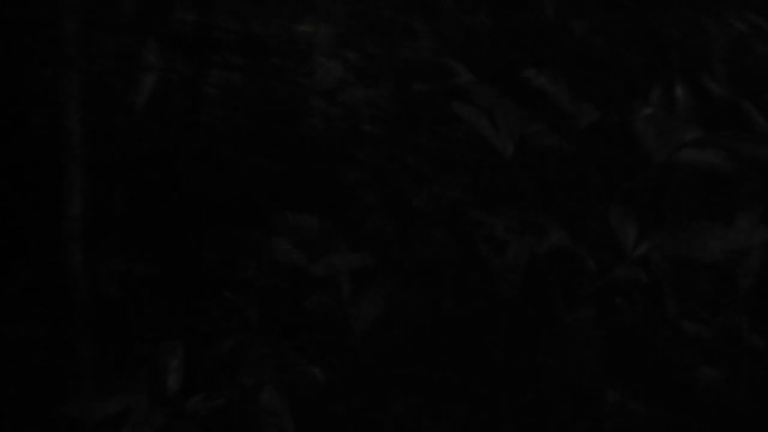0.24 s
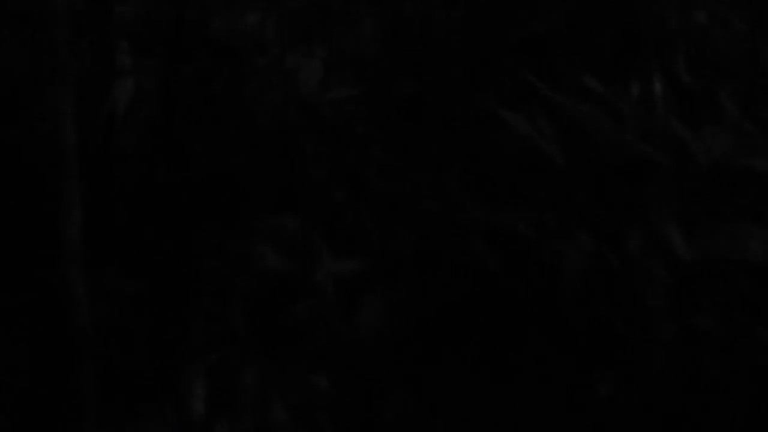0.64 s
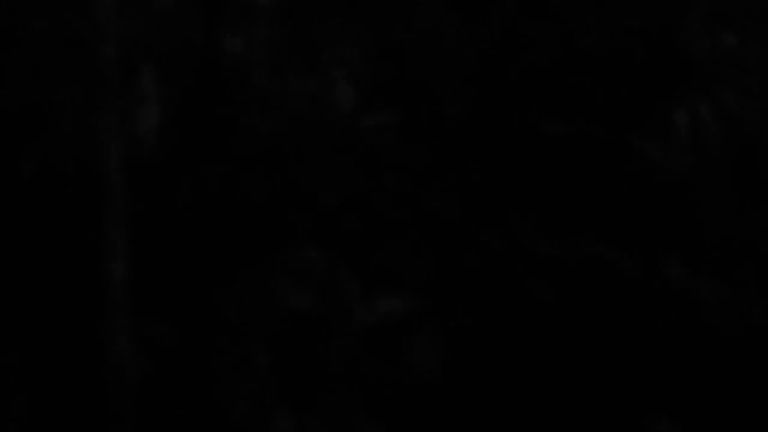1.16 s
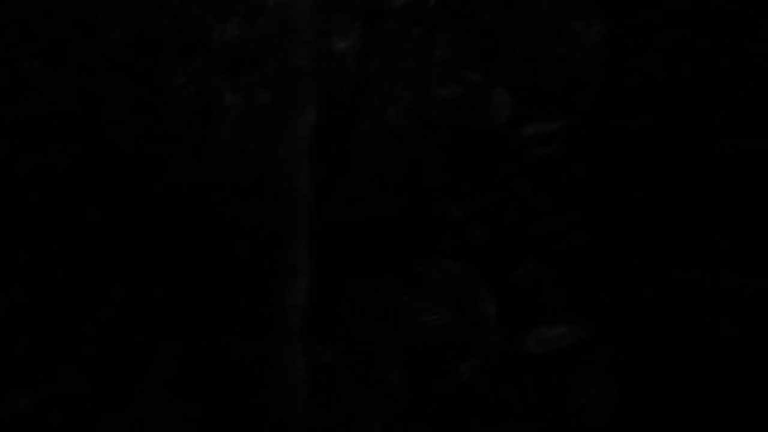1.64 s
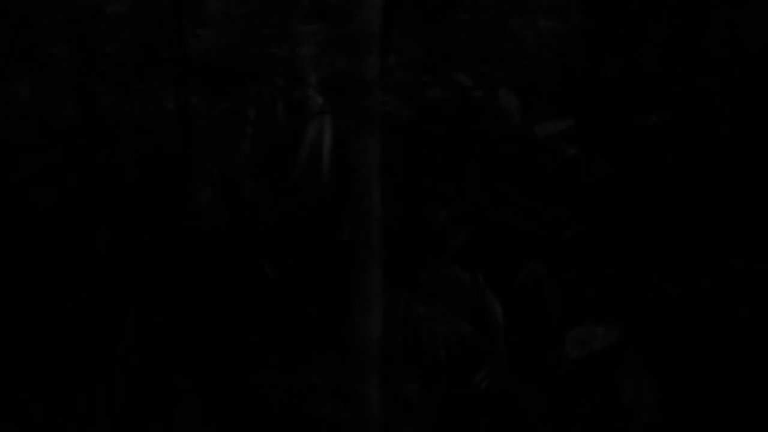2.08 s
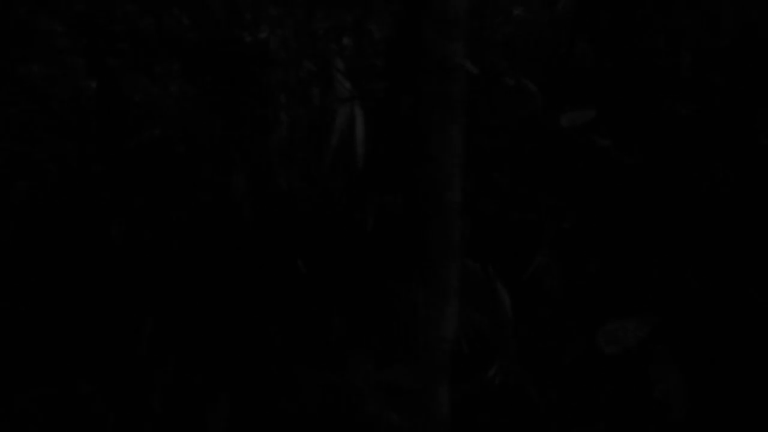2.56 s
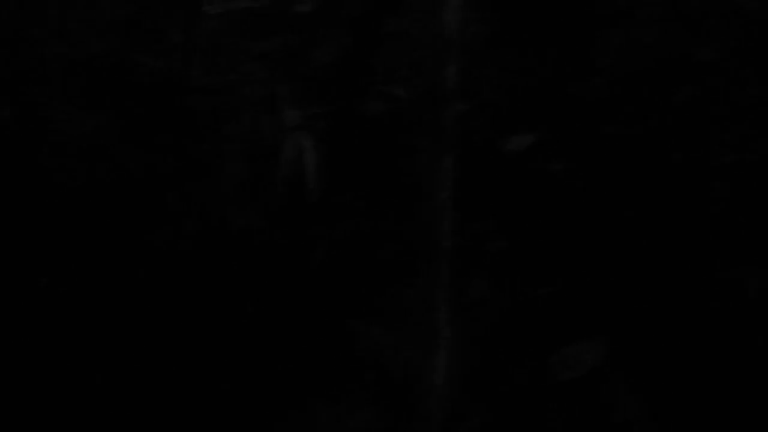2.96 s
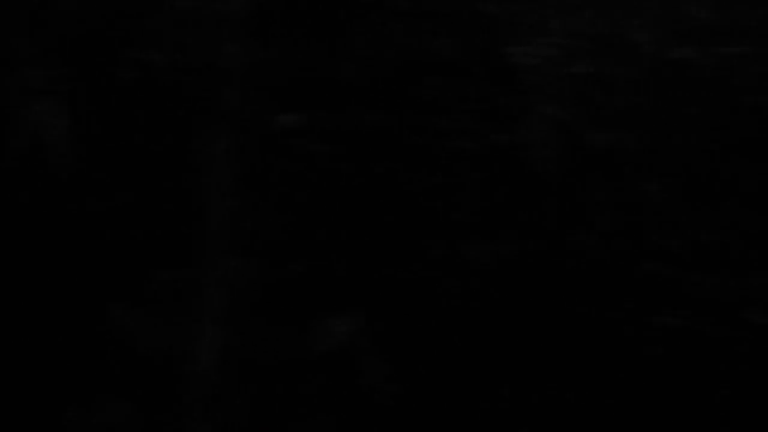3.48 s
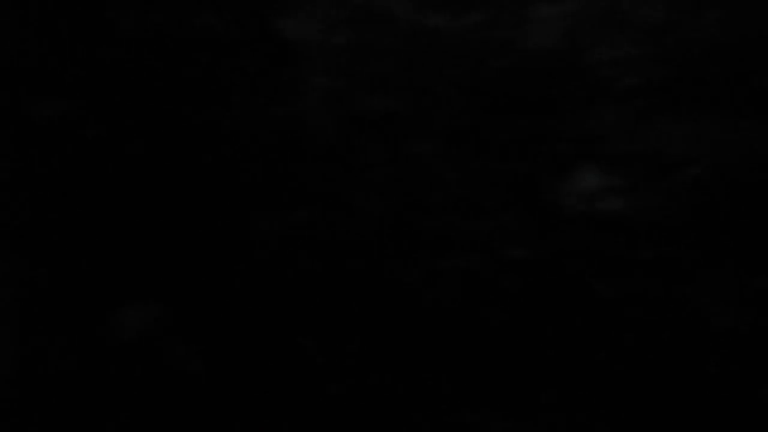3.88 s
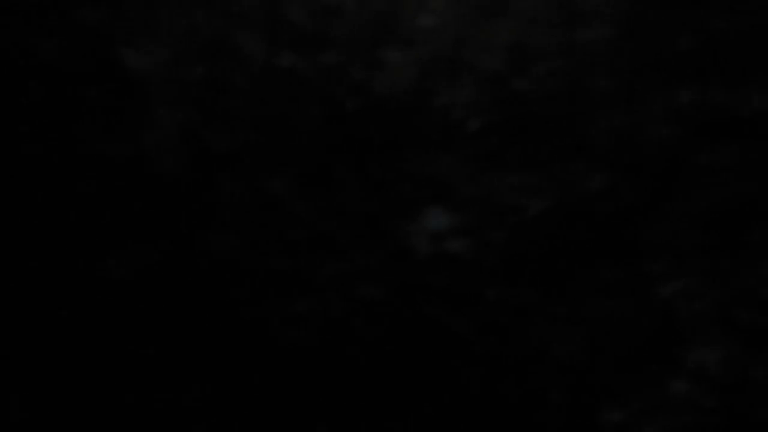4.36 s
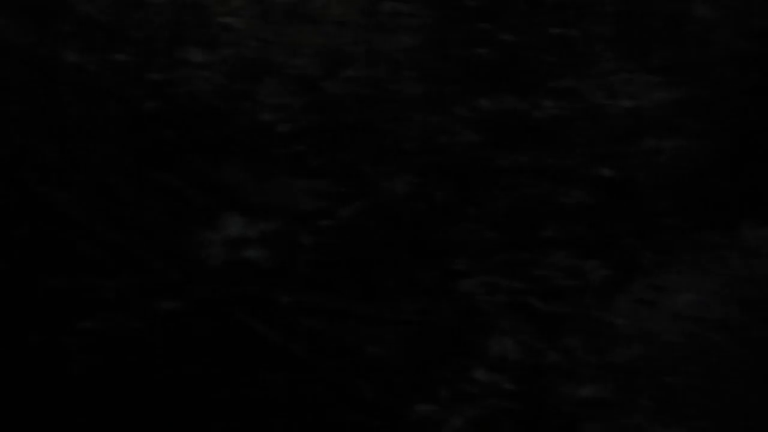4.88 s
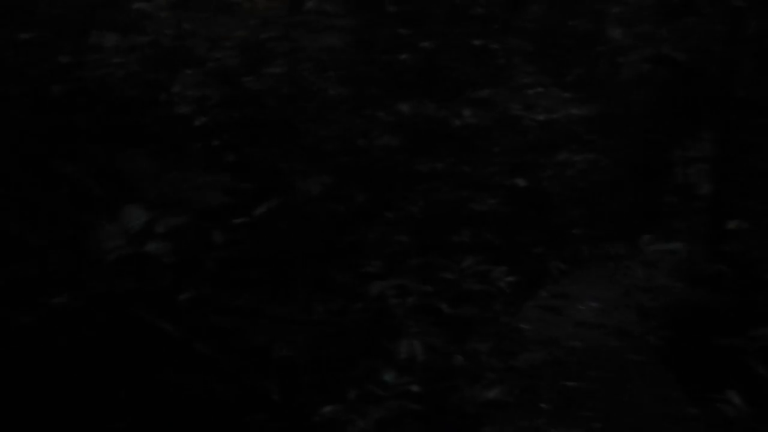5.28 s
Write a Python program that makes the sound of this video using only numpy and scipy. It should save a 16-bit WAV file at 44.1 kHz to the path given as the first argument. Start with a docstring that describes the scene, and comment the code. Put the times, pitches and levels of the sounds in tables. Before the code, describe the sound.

Walking slowly through dark forest, shrill insect trills layer over faint hiss, with ticking leaves and small woody knocks, until the nearest cricket cuts out.

```python
"""Rainforest at night, heard while walking slowly. A near cricket trills by wing stridulation and
stops, leaving its far neighbours, which sound through scatter. Higher up, three katydids give short
resonant rasps over a far blur, a thin buzz fades, and a low trill purrs on, like a mole cricket's,
as partials one pulse rate apart. Under them, shaped noise makes forest hiss, soft steps, ticking
leaves and a little handling rumble; damped tones make wooden knocks."""
import sys
import numpy as np
from scipy import signal
from scipy.fft import rfft, irfft, next_fast_len
from scipy.io import wavfile
from scipy.ndimage import uniform_filter1d

SR = 44100
rng = np.random.default_rng(int(sys.argv[2]) if len(sys.argv) > 2 else 0)


def int16_out(signal):
    """Quantize to a 16-bit WAV file."""
    q = np.round(np.clip(np.atleast_2d(signal).T, -1, 1) * 32767)
    wavfile.write(sys.argv[1], SR, q.astype(np.int16))


N = 244314
TIME = np.arange(N) / SR  # s

# near cricket: (time [s], level [dB], left over right [dB])
CRICKET_PATH = [(0.0, -27, 1), (0.15, -23, 2), (0.8, -23, -1), (0.81, -27, 5.0), (0.88, -19, -0.5),
                (1.14, -19, 4.5), (1.21, -18, 7.5), (1.3, -20.5, 5), (1.67, -18, 6), (1.74, -25, 2.5),
                (1.77, -21, 8.5), (1.84, -16.5, 1), (2.0, -18.5, 2), (2.02, -19.5, 5), (2.12, -15.5, 1),
                (2.22, -21.5, -3), (2.34, -18.5, 6.5), (2.64, -16.5, 3.5), (2.73, -17, 8.5),
                (3.29, -20.5, 7)]
# its scatter falls as the listener comes closer: (time [s], level relative to the direct song [dB])
CRICKET_SCATTER = [(0, -6.5), (1, -7), (2, -7.5), (3.3, -7.5)]
CRICKET_STOP_S = 3.322
STROKES_PER_S, SLOWING_PER_S2 = 92.66, 0.12

# far crickets together, slowly left behind: (time [s], level [dB], left over right [dB])
FAR_CRICKET_PATH = [(0, -23.5, 4), (1.2, -26, 6), (2.2, -26.5, 10), (3.35, -28.5, -1.5), (3.9, -28, 0.5),
                    (4.28, -29, 0.5), (4.7, -33, 2.5), (5.54, -36, 2.5)]
# one row a far cricket: (wing tone [Hz], stroke rate [1/s], relative level [dB])
FAR_CRICKET_VOICES = [(4217, 92.9, -1), (4363, 98.5, -6), (4199, 99, -2.5), (4413, 95.1, -15.5)]

# katydid chirps: (start [s], length [s], wing resonance [Hz], level [dB], left over right [dB])
KATYDID_CHIRPS = [(0, 0.05, 7060, -36.0, 0), (0.12, 0.1, 7210, -37.5, 1), (0.34, 0.14, 7050, -35.5, -1),
                  (0.35, 0.13, 6830, -39.5, -2), (0.64, 0.06, 6920, -31.0, 4), (0.79, 0.11, 7210, -37.5, 5),
                  (0.83, 0.1, 6890, -29.5, 0), (0.83, 0.1, 7040, -33.0, 2), (1.04, 0.14, 6870, -36.0, 0),
                  (1.04, 0.14, 7060, -36.5, -1), (1.04, 0.16, 7210, -36.5, 2), (1.28, 0.14, 6840, -39.5, 1),
                  (1.28, 0.14, 7070, -34.0, -2), (1.48, 0.07, 6860, -35.0, 0), (1.5, 0.12, 7215, -38.0, 1),
                  (1.67, 0.16, 7205, -34.0, 3), (1.82, 0.13, 6895, -29.5, 0), (2.03, 0.13, 6895, -30.5, -1),
                  (2.17, 0.12, 6865, -36.5, -2), (2.29, 0.12, 7060, -37.0, 0),
                  (2.47, 0.13, 7065, -34.5, -4), (2.58, 0.12, 7215, -39.5, 3),
                  (2.68, 0.12, 6885, -27.5, -2), (2.68, 0.18, 7050, -36.0, -3),
                  (2.72, 0.13, 7210, -35.0, 4), (2.81, 0.14, 6865, -38.0, 0), (3.05, 0.12, 7215, -33.5, -1),
                  (3.05, 0.15, 6880, -30.0, 0), (3.09, 0.13, 7050, -33.0, -5),
                  (3.34, 0.15, 7065, -32.0, -4), (3.52, 0.13, 6890, -29.0, -1),
                  (3.52, 0.14, 7210, -37.0, 1), (3.86, 0.1, 6865, -36.5, -4), (4.0, 0.11, 6870, -32.5, 0),
                  (4.0, 0.12, 7050, -32.0, -5), (4.11, 0.13, 7195, -35.5, -1), (4.2, 0.14, 6893, -26.0, -3),
                  (4.22, 0.15, 7065, -32.5, -4), (4.38, 0.2, 6875, -35.5, -3),
                  (4.45, 0.15, 7060, -30.5, -1), (4.46, 0.14, 7200, -38.0, -2),
                  (4.68, 0.15, 7195, -37.0, -3), (4.8, 0.12, 6875, -36.0, -3),
                  (4.95, 0.13, 7050, -33.0, -4), (4.98, 0.12, 6870, -31.0, -3),
                  (5.18, 0.18, 7075, -31.5, -3), (5.37, 0.09, 6895, -31.5, 0),
                  (5.45, 0.09, 7050, -38.0, -1)]
CHIRP_ATTACK_S, CHIRP_RELEASE_S = 0.01, 0.016  # exponential time constants
CHIRP_WIDTH_HZ = 49
# below this wing note a chirp gains pure pips, more strongly the louder it is
PIPS_BELOW_HZ = 6960
PIPS_EQUAL_DB = -23  # chirp level at which pips and rasp are equally strong
PIP_RATE = 26.5  # pips per s
# resonances of the far katydid blur: (centre [Hz], width [Hz], relative level [dB])
BLUR_MODES = [(6740, 350, -6.5), (6860, 78, 1.5), (7050, 23, -1.5), (7202, 51, -5.5)]
# the blur: (time [s], level [dB])
BLUR_PATH = [(0, -37.5), (1.5, -38), (2.6, -38.5), (3.8, -36), (4.4, -36.5), (5.54, -33.5)]

# thin, higher buzz that fades: (time [s], level [dB])
BUZZ_PATH = [(0, -44), (.8, -43.5), (1.1, -51), (1.4, -66)]

# two strong partials of the low trill: (time [s], lower level [dB], upper level [dB])
TRILL_PARTIALS = [(0.0, -39, -44), (0.08, -42, -69), (0.35, -36, -48), (0.52, -44.5, -48.5),
                  (1.27, -38, -39), (1.39, -42, -36.5), (1.82, -38.5, -44), (2.25, -44.5, -42),
                  (2.84, -42, -46), (2.93, -53.5, -48), (3.39, -45, -47.5), (3.56, -64, -46),
                  (3.66, -44, -41.5), (4.47, -53, -42), (4.72, -50, -42.5), (5.06, -50.5, -49.5),
                  (5.52, -45, -42), (5.54, -45, -38)]
TRILL_HZ, TRILL_PULSES_PER_S = 1578.5, 99.7  # lower strong partial, pulse rate

# noise spectra of rumble, undergrowth, far air and leaf hiss: (frequency [Hz], relative density [dB])
RUMBLE_SPECTRUM = [(10, -30), (28, -14), (55, -8), (85, -1), (130, -10), (250, -17), (600, -70)]
UNDERGROWTH_SPECTRUM = [(15, -60), (50, -45), (120, -11), (220, -4), (350, 0), (500, -2), (800, -5),
                        (1400, -8.5), (3000, -13.5), (7000, -70)]
AIR_SPECTRUM = [(20, -60), (200, -12.5), (600, -1), (1200, -1), (2200, -0.5), (3500, 0), (5000, 1),
                (5800, -5.5), (7500, -3), (9500, -10.5), (15000, -34)]
HISS_SPECTRUM = [(1500, -32), (5000, 1), (8500, 0), (10500, 1), (13000, 0), (15500, -5.5)]
# handling rumble, stirred undergrowth and leaf hiss: (time [s], level [dB])
RUMBLE_PATH = [(0, -66), (.25, -56.5), (.6, -70), (1.15, -61), (1.45, -68), (1.95, -49), (2.15, -71),
               (3.2, -77), (5.1, -74), (5.54, -65)]
UNDERGROWTH_PATH = [(0, -46.5), (.6, -45), (1.2, -44.5), (2.1, -44.5), (2.6, -43.5), (2.95, -45.5),
                    (3.5, -45), (4.9, -47.5), (5.3, -42.5), (5.54, -43)]
HISS_PATH = [(0, -55), (.55, -50), (1.04, -48), (1.1, -42.5), (1.4, -48.5), (2.2, -44.5), (2.6, -45.5),
             (2.85, -46), (3.65, -47.5), (4.2, -48), (4.85, -52), (5.4, -43.5)]
AIR_DB = -39
# likeness of the two sides in surrounding noise: (frequency [Hz], correlation [1])
SIDE_LIKENESS = [(30, 1.5), (70, 0), (150, 0.85), (400, 0.9), (1200, 0.86), (3000, 0.65), (6000, 0.53),
                 (10000, 0.2), (14000, -0.07)]
# its balance: (frequency [Hz], left over right [dB])
SIDE_BALANCE = [(30, 4), (70, 3), (150, 0), (600, -0.5), (1500, 0), (3000, 0), (6000, 0), (12000, 0)]

# footfalls and brushed stems, levels before the decay:
# (time [s], thud level [dB], crunch level [dB], time to fall 60 dB [s])
FOOTFALLS = [(0.197, -43, -38.5, 0.14), (0.659, -64, -35, 0.1), (0.679, -35, -32, 0.17),
             (0.993, -35.5, -36, 0.11), (1.337, -55, -38.5, 0.082), (1.494, -40, -44, 0.084),
             (1.665, -38, -51, 0.092), (1.71, -38, -47, 0.09), (1.839, -40, -28, 0.11),
             (2.338, -36.5, -40, 0.18), (2.45, -37, -45, 0.22), (2.599, -41, -43, 0.13),
             (2.678, -39, -41, 0.14), (3.492, -35, -40, 0.086), (3.622, -37, -45, 0.21),
             (4.129, -40, -40, 0.19)]
# spectra of thud and crunch: (frequency [Hz], relative density [dB])
THUD_SPECTRUM = [(20, -60), (70, -39), (200, -7), (420, 6.5), (650, 5.5), (1200, -1), (4000, -50)]
CRUNCH_SPECTRUM = [(30, -60), (180, -24), (650, -13), (1200, 3.5), (2100, 0.5), (3200, -9), (9000, -34)]

# leaf and twig ticks, level before the envelope:
# (time [s], level [dB], time to fall 60 dB [s], low cutoff [Hz])
LEAF_TICKS = [(0.3737, -23, 0.056, 6000), (0.5123, -30, 0.2, 2000), (0.9028, -27, 0.058, 2000),
              (1.0799, -26, 0.1, 7000), (1.2805, -24, 0.06, 5000), (1.6132, -25, 0.05, 5000),
              (1.72, -22.5, 0.06, 5000), (2.5656, -18, 0.036, 7000), (3.2034, -23, 0.05, 3000),
              (3.377, -24, 0.039, 3000), (3.625, -25, 0.22, 1500), (3.6472, -20, 0.2, 1500),
              (3.7393, -27, 0.07, 1500), (4.1091, -28, 0.05, 8000), (4.4357, -19, 0.03, 7000),
              (5.343, -22, 0.04, 700), (5.3925, -30, 0.05, 1000), (5.5206, -27, 0.039, 6000)]
# spectrum of the ticks: (frequency [Hz], relative density [dB])
TICK_SPECTRUM = [(40, -50), (500, 1), (2000, 1), (5500, 6), (9000, 2), (13000, -7), (16000, -19)]

# knocks of roots, stems and one snapping twig:
# (time [s], pitch [Hz], peak level [dB], half length [s])
WOOD_KNOCKS = [(0.682, 950, -27, 0.0011), (0.999, 472, -26.5, 0.0019), (1.678, 436, -26.5, 0.0035),
               (1.844, 888, -19, 0.00072), (1.964, 86, -39, 0.0076), (2.344, 380, -38, 0.0015),
               (2.461, 480, -42, 0.0037), (2.594, 403, -35.5, 0.0069), (2.642, 380, -34, 0.0018),
               (2.655, 362, -40, .002), (3.377, 3560, -13, 0.00045), (3.437, 420, -36, 0.0046),
               (3.501, 266, -31, 0.0046), (3.63, 270, -33, 0.0032)]

EDGE_HZ = 15730  # upper band limit


def amp(db):
    """Decibel law: level to amplitude gain."""
    return 10 ** (np.asarray(db) / 20)


def unit(x):
    """Normalization to an rms of 1."""
    return x / np.sqrt(np.mean(x ** 2) + 1e-20)


def curves(rows):
    """Linear interpolation of each table column over time."""
    s, *columns = np.transpose(rows)
    return [np.interp(TIME, s, column) for column in columns]


def read(points, hz):
    """Interpolation of a spectrum on a logarithmic frequency axis."""
    f, value = np.transpose(points)
    return np.interp(np.log(hz + 1), np.log(f + 1), value)


def add(mix, s, sound):
    """Superposition of a stereo sound onto the mix from time s."""
    part = mix[:, max(round(s * SR), 0):][:, :sound.shape[1]]
    part += sound[:, :part.shape[1]]


def wander(rate):
    """Low-passed random process of rms 1, with up to about rate changes a second."""
    size = next_fast_len(N)
    hz = np.fft.rfftfreq(size, 1 / SR)
    spectrum = rfft(rng.standard_normal(size)) * np.exp(-(hz / rate) ** 2)
    return unit(irfft(spectrum, size)[:N])


def flutter(depth_db, rate):
    """Random amplitude modulation, normally distributed in decibels."""
    return amp(depth_db * wander(rate))


def held(x, span):
    """Level compression over span seconds, which keeps the faster pulsing."""
    power = uniform_filter1d((x ** 2).mean(0), int(span * SR))
    return x / np.sqrt(power + 1e-9)


def place(x, pan_db):
    """Level-difference panning about a middle signal of rms 1."""
    sides = amp(np.array([pan_db, -pan_db]).reshape(2, -1) / 2)
    middle_rms = np.sqrt(np.mean(x.mean(0) ** 2))
    return x / middle_rms * sides / sides.mean(0)


def partner(a, b, same):
    """Correlation mixing: a second side that shares the fraction same with a."""
    return same * a + np.sqrt(1 - same ** 2) * b


def noise(gain, same, size=N):
    """Spectral shaping of stereo noise with a set correlation between the sides."""
    a, b = rfft(rng.standard_normal((2, size)))
    same = np.clip(same, -1, 1)
    x = irfft(gain * np.array([a, partner(a, b, same)]), size)
    return x / np.sqrt(np.mean(x.mean(0) ** 2))


def wash(spectrum, size=N):
    """Diffuse field: noise of one colour arriving from all around."""
    hz = np.fft.rfftfreq(size, 1 / SR)
    lean = read(SIDE_BALANCE, hz) / 2
    gain = amp(read(spectrum, hz) + np.array([lean, -lean]))
    return noise(gain, read(SIDE_LIKENESS, hz), size)


def rasp(modes, same, size=N):
    """Resonance: irregular tooth strikes, as noise, ring in narrow bands."""
    hz = np.fft.rfftfreq(size, 1 / SR)
    power = sum(amp(db) ** 2 / width / (1 + ((hz - f) / width) ** 2) ** 3 for f, width, db in modes)
    return noise(np.sqrt(power), same, size)


def trees(x, t60, same, drift=1.288, count=3):
    """Multiple scattering from trunks and leaves; the paths change as the listener walks."""
    t = np.arange(SR // 2) / SR
    shape = (count, 2, len(t))
    arrivals = rng.standard_normal(shape) * (rng.random(shape) < 2000 / SR)  # about 2000 a second
    taps = arrivals * amp(-60 * t / t60)
    out = np.zeros((2, N))
    for k in range(count):
        echo = irfft(rfft(x) * rfft(taps[k], N), N)
        # crossfade smoothly among independent sets of paths
        out += unit(echo) * np.cos(np.pi * (drift * TIME + k / count))
    same = np.clip(same, -1, 1)
    return unit(np.array([out[0], partner(out[0], out[1], same)]))


def strokes(rate, tone_hz, fall_hz, rise, fade, jitter, overtone_db):
    """Stridulation: each wing closing sounds a tone that swells, sinks in pitch and dies."""
    turns = np.cumsum(rate) / SR + rng.random()
    which, u = turns.astype(int), turns % 1  # stroke number, position within the stroke
    slip, size = rng.standard_normal((1000, 2))[which].T
    cycles = (tone_hz * (u - 0.5) - fall_hz * (u - 0.5) ** 2 / 2) / rate.mean()
    phase = 2 * np.pi * cycles + jitter * slip
    swell = u ** abs(rise) * (1 - u) ** abs(fade) * amp(0.78 * size)
    return unit(swell * (np.sin(phase) + amp(overtone_db) * np.sin(2 * phase)))


def near_cricket():
    """Stridulation with ground reflection and scatter: a fast trill that flutters and breaks off."""
    level_db, pan_db = curves(CRICKET_PATH)
    scatter_db, = curves(CRICKET_SCATTER)
    rate = (STROKES_PER_S - SLOWING_PER_S2 * TIME) * (1 + 0.0006 * wander(8))
    overtone_db = -33.0 - scatter_db  # leaves that scatter the song also swallow its overtone
    song = strokes(rate, tone_hz=4284, fall_hz=340, rise=0.7, fade=1.1, jitter=0.1,
                   overtone_db=overtone_db)
    # the ground path length wanders as the listener walks
    lag_s = 0.0026 + 0.00008 * np.array([wander(3.4), wander(4.4)])
    ground = amp(-11.5) * np.interp(TIME - lag_s, TIME, song)
    scatter = amp(scatter_db) * trees(song, t60=0.19, same=-0.29)
    heard = held(song + ground + scatter, 0.091)
    singing = np.clip((CRICKET_STOP_S - TIME) / 0.032 + 0.5, 0, 1)  # 32 ms ramp at the stop
    placed = place(heard, pan_db + 1.5 * wander(8))
    return placed * amp(level_db) * flutter(depth_db=0.5, rate=8) * singing


def far_crickets():
    """Superposition of several stridulators, each at its own rate, blurred by scattering."""
    level_db, pan_db = curves(FAR_CRICKET_PATH)
    song = np.zeros(N)
    for tone_hz, rate, db in FAR_CRICKET_VOICES:
        wavering_rate = rate * (1 + 0.00093 * wander(2.947))
        song += amp(db) * strokes(wavering_rate, tone_hz, fall_hz=510, rise=1.14, fade=1.43,
                                  jitter=0.73, overtone_db=-29.0)
    heard = held(amp(-1.5) * unit(song) + trees(song, t60=0.57, same=0.061), 0.075)
    return place(heard, pan_db) * amp(level_db) * flutter(depth_db=1.2, rate=9)


def chirp(length, hz, db, pan_db):
    """Wing resonance: one narrow katydid rasp that swells, holds and decays exponentially."""
    t = np.arange(SR // 3) / SR
    voice = rasp([(hz, CHIRP_WIDTH_HZ, 0)], same=0.54, size=len(t))
    if hz < PIPS_BELOW_HZ:
        pips = unit(np.sin(np.pi * PIP_RATE * t) ** 4 * np.sin(2 * np.pi * hz * t))
        voice = voice + pips * amp(db - PIPS_EQUAL_DB)
    attack = 1 - np.exp(-t / CHIRP_ATTACK_S)
    release = np.exp(-np.maximum(t - length, 0) / CHIRP_RELEASE_S)
    return place(held(voice, 0.024), pan_db) * amp(db) * attack * release


def katydids():
    """Resonant rasping: chirps of three near katydids, some overlapping, over a blur of far ones."""
    level_db, = curves(BLUR_PATH)
    blur = place(rasp(BLUR_MODES, same=0.33), pan_db=-0.7)
    out = blur * amp(level_db) * flutter(depth_db=1.5, rate=17)
    for start, *row in KATYDID_CHIRPS:
        add(out, start, chirp(*row))
    return out


def thin_buzz():
    """Amplitude modulation: a higher insect rasp pulses and fades after the first second."""
    level_db, = curves(BUZZ_PATH)
    pulse_hz = 50 + 2 * wander(4.4)
    pulsing = 1 + 0.5 * np.sin(2 * np.pi * np.cumsum(pulse_hz) / SR)
    return rasp([(7800, 190, -13), (7860, 270, -5)], same=0.6) * pulsing * amp(level_db)


def low_trill():
    """Sidebands: two strong partials one pulse rate apart, weak neighbours, and scatter."""
    lower_db, upper_db = curves(TRILL_PARTIALS)
    tone = 2 * np.pi * np.cumsum(TRILL_HZ + 2 * wander(10.5)) / SR
    pulse = 2 * np.pi * np.cumsum(TRILL_PULSES_PER_S + 2.27 * wander(5.82)) / SR
    levels = [lower_db - 16, lower_db, upper_db, upper_db - 17.0]
    song = np.zeros(N)
    for k, db in enumerate(levels):
        partial = np.cos(tone + (k - 1) * pulse)
        song += np.sqrt(2) * amp(db) * flutter(depth_db=1.02, rate=10) * partial
    blur = rasp([(1630, 160, 0)], same=0.7) * np.hypot(amp(lower_db), amp(upper_db))
    direct = song * amp([[-2.4], [2.3]])  # stronger on the right
    return direct + amp(-9.5) * blur + amp(-46.5) * trees(song, t60=0.88, same=0.59)


def forest_floor():
    """Diffuse noise fields: handling rumble, stirred undergrowth, far air and crackling leaves."""
    rumble_db, = curves(RUMBLE_PATH)
    growth_db, = curves(UNDERGROWTH_PATH)
    hiss_db, = curves(HISS_PATH)
    rumble = wash(RUMBLE_SPECTRUM) * amp(rumble_db) * flutter(depth_db=2.5, rate=24)
    undergrowth = wash(UNDERGROWTH_SPECTRUM) * amp(growth_db) * flutter(depth_db=2.5, rate=28)
    air = wash(AIR_SPECTRUM) * amp(AIR_DB) * flutter(depth_db=1.27, rate=22)
    crackle = flutter(depth_db=1.3, rate=290) * flutter(depth_db=1.9, rate=24)
    hiss = wash(HISS_SPECTRUM) * amp(hiss_db) * crackle
    return rumble + undergrowth + air + hiss


def steps():
    """Damped impact noise: soft ground thuds while dry litter crunches in clumps."""
    out, t = np.zeros((2, N)), np.arange(SR // 4) / SR
    for s, thud_db, crunch_db, t60 in FOOTFALLS:
        clumps = amp(2.8 * unit(uniform_filter1d(rng.standard_normal(len(t)), size=150)))
        thud = amp(thud_db) * wash(THUD_SPECTRUM, len(t))
        crunch = amp(crunch_db) * wash(CRUNCH_SPECTRUM, len(t))
        envelope = (1 - np.exp(-t / 0.00097)) * amp(-60 * t / t60)
        add(out, s, (thud + crunch) * clumps * envelope)
    return out


def ticks():
    """Impulsive fracture: a sharp crack, then a grainy rustle; small leaves have no low tones."""
    out, t = np.zeros((2, N)), np.arange(SR // 5) / SR
    for s, db, t60, lowest_hz in LEAF_TICKS:
        grains = amp(3.8 * unit(uniform_filter1d(rng.standard_normal(len(t)), size=40)))
        crack = amp(-5) * np.exp(-t / 0.0012)
        rustle = amp(-13) * amp(-60 * t / t60) * grains
        sound = amp(db) * wash(TICK_SPECTRUM, len(t)) * (crack + rustle)
        thin = signal.butter(2, lowest_hz, "high", fs=SR, output="sos")
        add(out, s, signal.sosfilt(thin, sound))
    return out


def knocks():
    """Heavy damping: damp wood rings briefly, a cosine under a Gaussian envelope."""
    out = np.zeros(N)
    for s, hz, db, length in WOOD_KNOCKS:
        envelope = np.exp(-((TIME - s) / length) ** 2)
        out += amp(db) * envelope * np.cos(2 * np.pi * hz * (TIME - s))
    return out


def scene():
    """Superposition of the insects and the forest floor."""
    insects = near_cricket() + far_crickets() + katydids() + thin_buzz() + low_trill()
    return insects + forest_floor() + steps() + ticks() + knocks()


def record(dry):
    """Band limitation: a linear-phase low-pass filter."""
    lowpass = signal.firwin(801, EDGE_HZ, window=("kaiser", 9), fs=SR)
    return signal.oaconvolve(dry, lowpass[None], "same")


dry = scene()
out = record(dry)
int16_out(out)
```